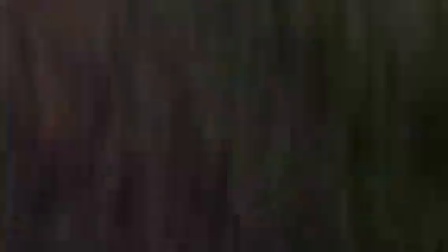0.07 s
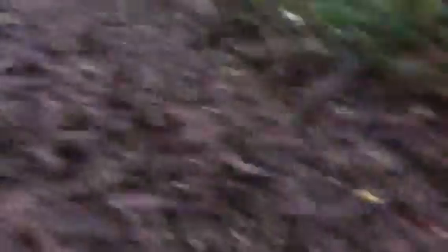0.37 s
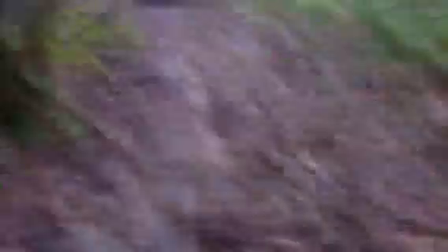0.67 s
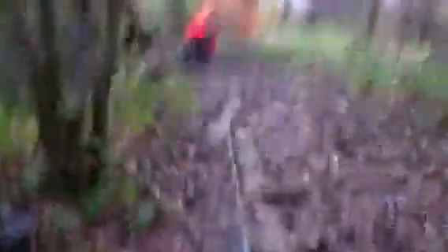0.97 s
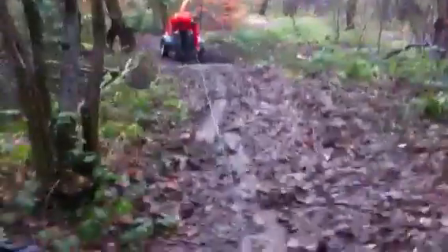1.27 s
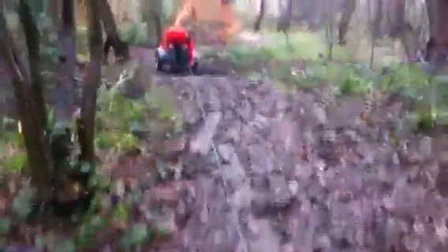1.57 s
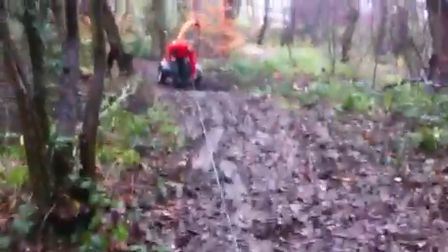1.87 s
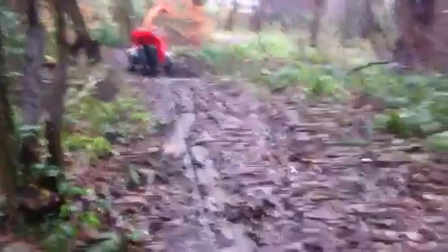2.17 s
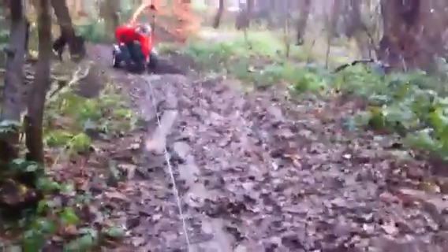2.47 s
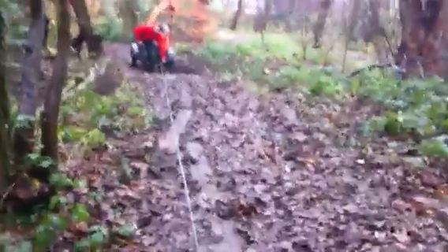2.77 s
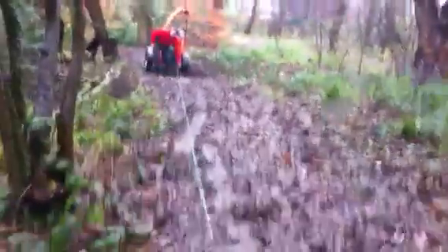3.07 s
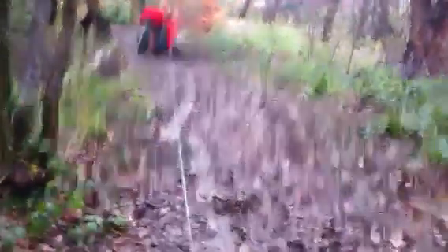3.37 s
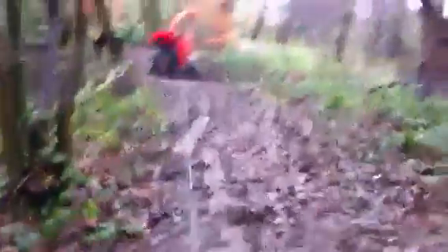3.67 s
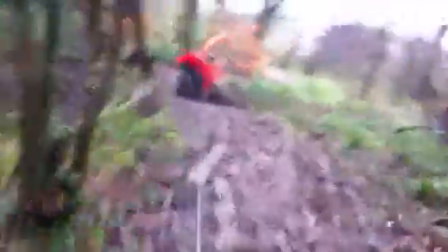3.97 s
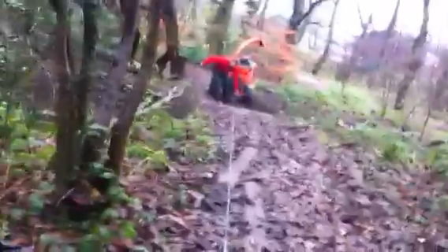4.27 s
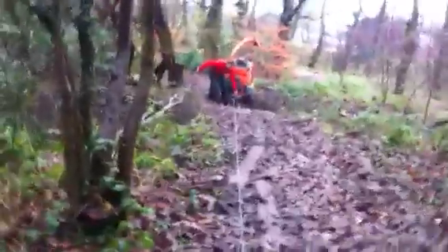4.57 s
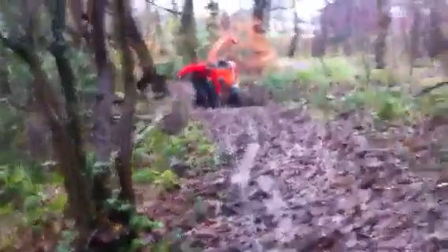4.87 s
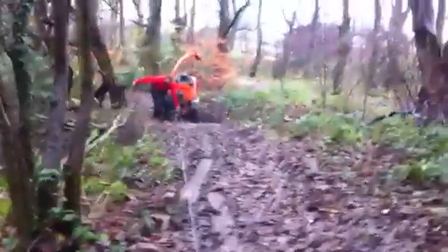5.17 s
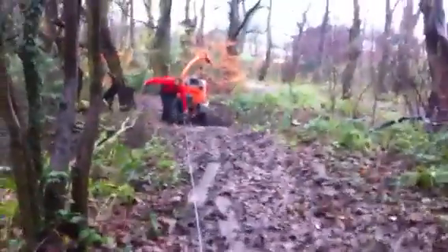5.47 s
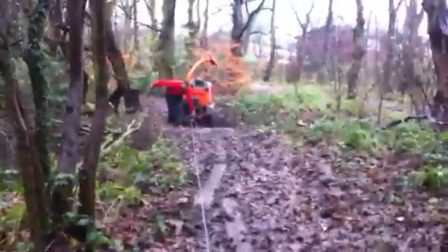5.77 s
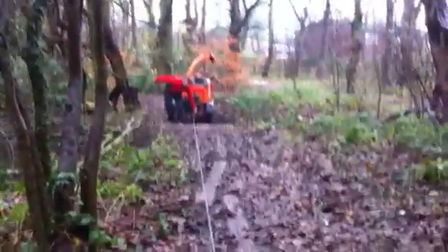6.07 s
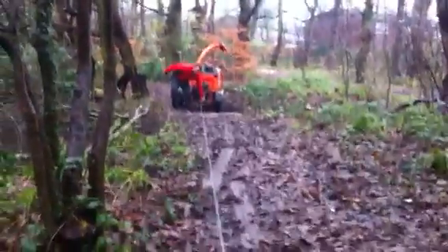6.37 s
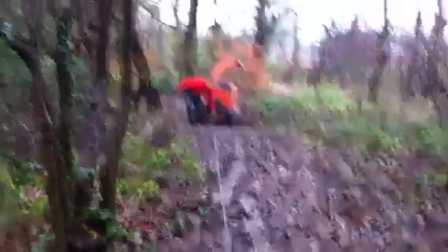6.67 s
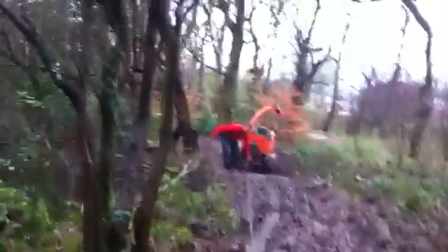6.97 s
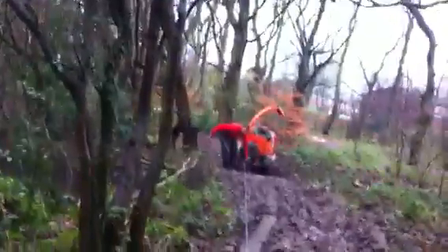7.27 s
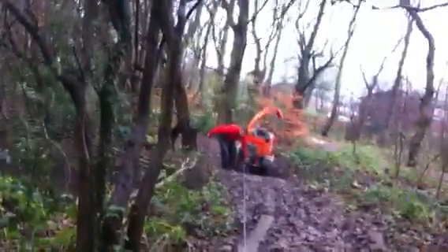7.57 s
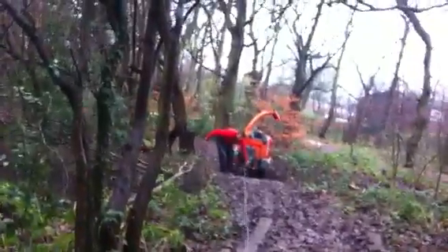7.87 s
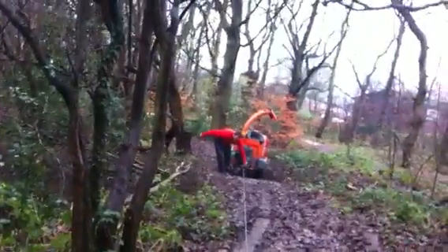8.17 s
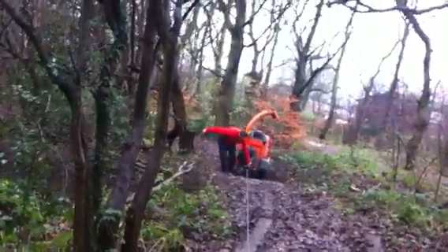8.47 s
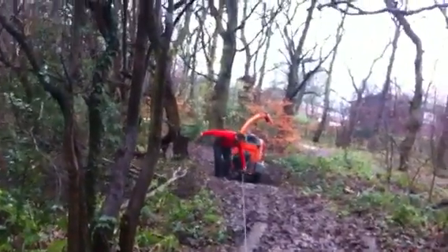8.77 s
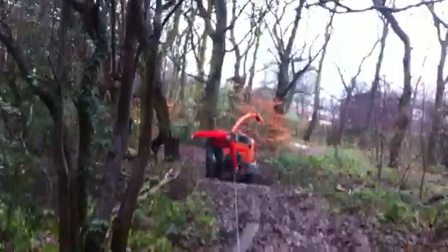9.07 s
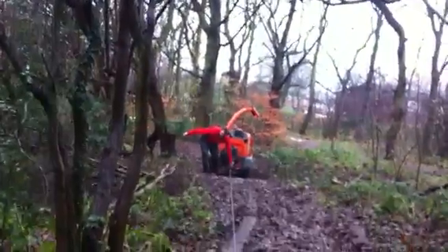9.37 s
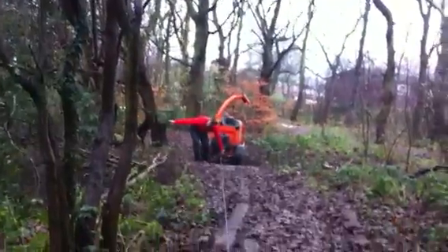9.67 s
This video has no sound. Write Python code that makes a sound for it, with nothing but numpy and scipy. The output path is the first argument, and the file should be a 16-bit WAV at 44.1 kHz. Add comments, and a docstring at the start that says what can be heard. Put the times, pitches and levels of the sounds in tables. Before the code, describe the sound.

A nearby electric winch coasts to a stop, pauses with small knocks, then clacks and runs again with a loud whine and metallic rattle.

```python
"""An electric winch, close by, drags a machine up a muddy woodland track on its cable.
It coasts to rest; small knocks and a rustle fill the pause, over a distant rumble.
Then its contactor clacks and it runs up again: a ten-tooth pinion whines, tooth impacts rattle
the housing, loose steel chatters brightly and the motor brushes hiss."""
import sys
import numpy as np
from scipy import signal
from scipy.fft import rfft, irfft
from scipy.io import wavfile
from scipy.ndimage import uniform_filter1d

SR = 44100
rng = np.random.default_rng(int(sys.argv[2]) if len(sys.argv) > 2 else 0)


def generate_wav(sig):
    """Save sig (samples, or channels by samples) to the path in sys.argv[1] as 16-bit PCM at SR."""
    pcm = np.round(np.clip(np.atleast_2d(sig).T, -1, 1) * 32767).astype(np.int16)
    wavfile.write(sys.argv[1], SR, pcm)


N = 428211
TIME = np.arange(N) / SR
HZ = np.fft.rfftfreq(16384, 1 / SR)
START_S, PINION_TEETH = 1.8, 10
RUN_TIME_S = np.maximum(TIME - START_S, 0)  # since the gears engaged

# A small housing radiates little bass. Each row: frequency in Hz, gain in dB.
LOW_CUT = [(40, -45), (100, -6.5), (200, -3), (330, 2), (16000, 6)]


def amp(db):
    """Decibels to gain."""
    return 10 ** (np.asarray(db) / 20)


def unit(x):
    """Scales to rms 1."""
    return x / np.sqrt(np.mean(x ** 2) + 1e-20)


def slope(points):
    """Gain over frequency through (Hz, dB) points."""
    hz, db = np.transpose(points)
    return amp(np.interp(np.log(HZ + 1), np.log(hz), db))


def peaks(modes):
    """Gain over frequency of a set of resonances."""
    return np.sqrt(sum(amp(db) ** 2 / (1 + (2 * (HZ - hz) / width) ** 2) for hz, width, db in modes))


def ring(x, gain):
    """Passes x through a minimum-phase body with this gain over frequency."""
    log_gain = np.log(np.maximum(np.r_[gain, gain[-2:0:-1]], 1e-5))
    response = np.fft.ifft(np.exp(np.conj(signal.hilbert(log_gain)))).real
    taper = np.hanning(2 * len(HZ))[len(HZ):]
    return signal.oaconvolve(x, response[:len(HZ)] * taper)[:len(x)]


def per_band(gain, band_hz):
    """Scales a gain so that unit white noise comes out with rms 1 inside the band."""
    return gain / np.sqrt(np.mean(gain ** 2 * (HZ > band_hz[0]) * (HZ < band_hz[1])))


def wander(rate_hz):
    """Random drift of rms 1, up to about this rate."""
    hz = np.fft.rfftfreq(N, 1 / SR)
    return unit(irfft(rfft(rng.standard_normal(N)) / (1 + (hz / rate_hz) ** 2) * (hz > 2), N))


def curve(points):
    """Straight lines over time through (s, value) points."""
    return np.interp(TIME, *np.transpose(points))


def level(points):
    """Gain through (s, dB) points: silent before the first, held after the last."""
    s, db = np.transpose(points)
    return uniform_filter1d(np.interp(TIME, s, amp(db), left=0), size=200)


def bursts(rows, rise_s):
    """Puffs of noise, one per (start s, dB, decay s) row."""
    envelope = np.zeros(N)
    for start_s, db, decay_s in rows:
        age_s = np.maximum(TIME - start_s, 0)
        envelope += amp(db) * (1 - np.exp(-age_s / rise_s)) * np.exp(-age_s / decay_s)
    return envelope * rng.standard_normal(N)


def coast():
    """Freewheeling gears knock ever more slowly and leave the housing ringing."""
    # Slack knocks. Each row: time in seconds, knocks per second.
    knock_rate = [(0, 164), (.15, 85), (.27, 36)]
    # Dying rattle. Each row: time in seconds, relative level in dB.
    rattle_levels = [(0.0, -23), (0.092, -27.5), (0.194, -47), (0.27, -55)]
    # Resonances struck by the slack gears. Each row: frequency in Hz, width in Hz, gain in dB.
    slack_modes = [(189, 34, 5), (616, 35, -1), (800, 39, 1), (950, 50, 3.5), (1240, 55, -1), (1440, 31, 8),
                   (1570, 50, -5), (1870, 54, 1), (2500, 80, -2), (2710, 90, -2.5), (3480, 83, -5.5),
                   (4560, 63, -10), (5000, 70, -18), (6300, 200, -9), (6500, 150, -8), (8050, 220, -15),
                   (9200, 80, -14), (10200, 70, -16)]
    # Broad rattle spectrum. Each row: frequency in Hz, gain in dB.
    colour = [(60, -45), (200, -38), (1000, -7), (3000, -17), (5500, -21), (10500, -27), (15000, -47)]
    # Ringing housing. Each row: frequency in Hz, relative level in dB, T60 in seconds.
    ring_modes = [(483, -11.5, 0.96), (625, -20, .5), (925, 1.5, 1), (1265, -16, .5), (1445, 0, 0.88),
                  (2320, -4, 0.53)]
    count = np.cumsum(curve(knock_rate)) / SR
    contact = 0.42 + np.exp(-(count % 1) / 0.16)
    knocks = unit(contact * amp(1.3 * wander(120)) * rng.standard_normal(N))
    body = per_band(np.hypot(peaks(slack_modes), slope(colour)) * slope(LOW_CUT), (400, 4000))
    rattle = ring(knocks * level(rattle_levels) * amp(-3), body)
    tones = sum(amp(db - 60 * TIME / t60_s) * np.sin(2 * np.pi * (hz * TIME + rng.random()))
                for hz, db, t60_s in ring_modes)
    tones *= amp(-32.5 + 2 * wander(25))
    return (rattle + tones) * np.interp(TIME, [.22, .29], [1, 0])


def woodland(rumble_db=-47.5, hiss_db=-57.5):
    """A low, distant rumble under the trees, and faint even hiss."""
    # Rumble and hiss spectra. Each row: frequency in Hz, gain in dB.
    rumble_colour = [(25, -34), (55, -30), (85, -23.5), (135, 3), (240, 0), (310, 1), (360, -7),
                     (500, -7.5), (1400, -12), (2100, -26), (4000, -39)]
    hiss_colour = [(300, 12), (2000, 4), (4000, 2), (8000, -0.5), (15000, -0.5)]
    rumble = amp(rumble_db + 1.7 * wander(11)) * unit(ring(rng.standard_normal(N), slope(rumble_colour)))
    return rumble + amp(hiss_db) * unit(ring(rng.standard_normal(N), slope(hiss_colour)))


def handling():
    """Small handling knocks and a soft rustle of sleeve and leaves."""
    # Knocks. Each row: start in seconds, level in dB, decay in seconds.
    knocks = [(.289, -33, 0.0051), (.303, -38, 0.023), (.358, -44, 0.0055), (.607, -52, .008),
              (1.115, -47, .005), (1.177, -48, .004), (1.56, -44, .004)]
    # Rustle. Each row: time in seconds, relative level in dB.
    rustle_levels = [(0.7, -75), (0.79, -50.5), (0.92, -56), (0.946, -64), (0.972, -65), (1.0, -72)]
    # Knock and rustle spectra. Each row: frequency in Hz, gain in dB.
    knock_colour = [(120, -37), (200, -5), (530, 3), (683, -14), (748, 6), (1170, 4), (2020, -2),
                    (2170, -6), (6190, -8), (15000, -13)]
    rustle_colour = [(1180, -24), (2000, 5), (3040, -5), (3840, 3), (4750, -5), (7050, -1), (15500, -4)]
    grains = unit(amp(1.9 * wander(400)) * rng.standard_normal(N))
    envelope = level(rustle_levels) * amp(-.5) * np.interp(TIME, [.95, 1.15], [1, 0])
    rustle = ring(grains * envelope, unit(slope(rustle_colour)))
    return rustle + ring(bursts(knocks, rise_s=0.00032), unit(slope(knock_colour)))


def housing():
    """Gain over frequency of the gear housing: resonances over a broad shell response."""
    # Resonances. Each row: frequency in Hz, width in Hz, gain in dB.
    modes = [(309.3, 7.9, -13.5), (458.6, 25.5, -9), (507, 58, -14), (629, 18, -15), (754, 22, -9.5),
             (813, 44, -10), (946, 14.5, -2), (1326, 37, -13), (1409, 34, -6.5), (1582, 13, -28),
             (1899, 25, -12), (1980, 58, -15), (2274, 44, -16), (2400, 64, -22), (2560, 34, -9.5),
             (2766, 20, -18), (2890, 19, -19), (3047, 20, -13), (3437, 38, -14)]
    # Shell response. Each row: frequency in Hz, gain in dB.
    shell = [(60, -33), (220, -43), (350, -23), (560, -19.5), (1050, -20), (1200, -27), (1700, -21),
             (3200, -26), (4400, -22), (5400, -41), (7000, -36), (16000, -36)]
    return np.hypot(peaks(modes), slope(shell)) * slope(LOW_CUT)


def clacks():
    """The contactor shuts, then the gears take up their slack and thump the housing."""
    # Each row: start in seconds, relative level in dB, decay in seconds, thump offset in dB.
    hits = [(1.745, -19.5, 0.016, -18), (1.759, -14.5, 0.0084, -1), (1.779, -27.5, 0.011, 9.5)]
    # Clack spectrum. Each row: frequency in Hz, gain in dB.
    colour = [(100, -28), (600, 1), (2000, -15), (3500, -8), (4800, -1.5), (6300, 1.5), (8000, -3),
              (11000, -10), (15500, -12)]
    crack = bursts([(s, db, decay_s) for s, db, decay_s, _ in hits], rise_s=0.0013)
    thump = bursts([(s, db + thump_db, decay_s) for s, db, decay_s, thump_db in hits], rise_s=0.0013)
    tail = bursts([(s, db - 24, .025) for s, db, _, _ in hits], rise_s=0.0033)
    return amp(3.5) * ring(crack + tail, unit(slope(colour))) + ring(thump, unit(housing()))


def tooth_hz(start_share=.505, run_up_s=.22):
    """Tooth rate: the motor runs up from about half speed, then varies with the cable's pull."""
    # Motor speed. Each row: time in seconds, tooth rate in Hz once run up.
    speeds = [(2.6, 834), (3.0, 821), (3.8, 823), (4.1, 840), (4.5, 872), (5.4, 880), (5.7, 898),
              (6.0, 947), (6.4, 982), (6.8, 985), (7.4, 1052), (7.8, 1038), (8.5, 985), (8.9, 969),
              (9.71, 1006)]
    return curve(speeds) * (1 - (1 - start_share) * np.exp(-RUN_TIME_S / run_up_s))


def torque(free_hz=1100):
    """Relative torque: grows as the tooth rate sags below its no-load value, up to a limit."""
    return np.minimum(1 - tooth_hz() / free_hz, .4)


def load_db(usual_db=-30.5):
    """Load on the gears above its usual value."""
    # Each row: time in seconds, load as a rattle level in dB.
    loads = [(2.0, -26), (2.6, -30.0), (2.85, -28), (3.85, -31), (4.8, -31.0), (5.0, -30), (5.7, -32),
             (5.8, -34.0), (6.25, -33.5), (6.35, -32.5), (7.1, -33), (7.7, -28.5), (7.85, -32.5),
             (8.2, -29.5), (9.3, -30.5), (9.7, -32.5)]
    return curve(loads) - usual_db


def running():
    """Zero until the gears engage, then one."""
    return uniform_filter1d((TIME > START_S) * 1., size=200)


def follow(db, per_load, torque_db, start_cut_db, build_s):
    """Gain of a part: builds up after the start and follows load (dB per dB) and torque."""
    cut_db = start_cut_db * np.exp(-RUN_TIME_S / build_s)
    return running() * amp(db + per_load * load_db() + torque_db * torque() - cut_db)


def surge():
    """Gain of the gear tones: a smooth swell at each strain."""
    # Each row: centre in seconds, 1/e half-width in seconds, boost in dB.
    strains = [(2.8, .07, 3), (3.13, 0.058, 5.5), (3.563, 0.17, 6), (8.9, 0.14, 5)]
    return amp(sum(db * np.exp(-((TIME - s) / half_s) ** 2) for s, half_s, db in strains))


def sing(hz, waver_hz, throb_db, rate_hz):
    """A mode kept ringing by uneven blows: its pitch wavers and its level throbs."""
    cycles = np.cumsum(hz + waver_hz * wander(rate_hz)) / SR
    return unit(np.sin(2 * np.pi * cycles) * amp(throb_db * wander(rate_hz)))


def whine(teeth, wobble=0.1, rasp=0.28, fade_db_per_s=14):
    """The pinion's raspy tone swells in each mount resonance; a rough fifth rises with it and fades."""
    # Gear mount resonances. Each row: frequency in Hz, width in Hz, gain in dB.
    mount_modes = [(492, 30, -1.5), (720, 120, -6), (822.5, 7.7, -3), (890, 53, -4.5), (974, 12.5, -5)]
    mount = np.interp(tooth_hz(), HZ, peaks(mount_modes))
    uneven = 1 + wobble * np.sin(2 * np.pi * teeth / PINION_TEETH) + rasp * wander(87)
    pinion = np.sqrt(2) * np.sin(2 * np.pi * teeth) * mount * uneven * amp(2.25 * wander(18))
    pinion *= follow(-28, per_load=1.83, torque_db=-0.5, start_cut_db=9, build_s=0.9)
    fifth = sing(1.5 * tooth_hz(), waver_hz=38, throb_db=3, rate_hz=60)
    fifth *= follow(-30.5, per_load=2.5, torque_db=0, start_cut_db=24, build_s=0.7)
    return pinion + fifth * amp(-fade_db_per_s * RUN_TIME_S)


def drone(low_hz=489.5, build_s=0.66):
    """The housing sings: a strong low mode, and two that swell as shaft multiples meet them."""
    # Low mode. Each row: time in seconds, relative level in dB.
    low_levels = [(1.85, -29.5), (2.4, -47), (2.5, -33.5), (3.8, -42), (3.95, -35.5), (5.1, -33.5),
                  (5.2, -39.5), (5.95, -30.5), (6.1, -43.5), (6.6, -27), (6.85, -29), (7.1, -41.5),
                  (7.55, -39.5), (7.6, -34), (8.3, -28), (8.6, -34.0), (9.0, -27), (9.7, -33.5)]
    # Higher modes. Each row: frequency in Hz, capture width in Hz, floor in dB,
    # drive on a multiple in dB, dB per dB of load, waver in Hz, throb in dB.
    high_modes = [(638, 13.5, -66, -35, 0.1, 3.1, 2), (1420.5, 49, -35.5, -32.5, 1.4, 13.1, 3)]
    low = amp(curve(low_levels) + 0.5) * sing(low_hz, waver_hz=7.4, throb_db=3, rate_hz=24.4)
    shaft_hz = tooth_hz() / PINION_TEETH
    high = np.zeros(N)
    for hz, width_hz, floor_db, on_db, per_load, waver_hz, throb_db in high_modes:
        detune_hz = hz - shaft_hz * np.round(hz / shaft_hz)
        drive = np.hypot(amp(floor_db), amp(on_db) / np.hypot(1, 2 * detune_hz / width_hz))
        high += drive * amp(per_load * load_db()) * sing(hz, waver_hz, throb_db, rate_hz=36)
    return low * running() + high * (1 - np.exp(-RUN_TIME_S / build_s))


def impacts(teeth, spread_db, clump_db, clump_hz, scrape):
    """Each tooth lands with its own force and scrapes on; blows bunch up as the slack wanders."""
    force = amp(spread_db * np.clip(rng.standard_normal(N), -2, 2))[teeth.astype(int)]
    contact = scrape + np.exp(-(teeth % 1) / 1.4)
    return unit(force * contact * amp(clump_db * wander(clump_hz)) * rng.standard_normal(N))


def gearbox(teeth, lurch):
    """Tooth impacts and gear tones shake the housing; the tones grow with torque."""
    # Gear tones. Each row: multiple of the shaft rate, relative level in dB.
    orders = [(3, -8.5), (4, -15), (5, -0.5), (6, -4), (7, -9), (8, -26), (9, -9.5), (11, -2), (12, -7),
              (13, -9), (15, -6.5), (16, -6), (19, -7), (20, -2), (21, -10), (30, -3)]
    turns = teeth / PINION_TEETH
    hum = sum(amp(db + 4.9 * wander(4.7)) * np.sin(2 * np.pi * order * turns) for order, db in orders)
    hum *= surge() * amp(-25.5 + 12 * torque())
    blows = impacts(teeth, spread_db=0.7, clump_db=0, clump_hz=60, scrape=1)
    gain = follow(-30, per_load=1, torque_db=2, start_cut_db=10.5, build_s=0.37)
    return ring((blows + hum) * lurch * gain, per_band(housing(), (1300, 4200)))


def chatter(blows, lurch):
    """Loose steel rings brightly under bunches of blows."""
    # Steel resonances. Each row: frequency in Hz, width in Hz, gain in dB.
    modes = [(4747.0, 66.0, -14.0), (4956.0, 66.0, -15.0), (5988.0, 90.0, 0.5), (6150.0, 98.0, -1.0),
             (6290.0, 92.0, -0.5), (6609.0, 137.0, -8.0), (6887.0, 36.0, 2.0), (7061.0, 45.0, -19.0),
             (7365.0, 169.0, -9.0)]
    # Their overall shape. Each row: frequency in Hz, gain in dB.
    colour = [(60, -70), (1000, -24.5), (3500, -5.5), (4700, 6), (7600, 4), (9500, 10), (16000, 1.5)]
    steel = per_band(peaks(modes) * slope(colour), (5700, 7300))
    gain = follow(-18, per_load=-0.27, torque_db=-1, start_cut_db=22, build_s=0.22)
    return ring(blows * lurch * gain * amp(wander(22)), steel)


def brushes(teeth, blows, lurch):
    """The brushes rub and spark; their holders ring harder under torque."""
    # Holder resonances. Each row: frequency in Hz, width in Hz, gain in dB.
    holder_modes = [(5547, 40, -6), (7830, 80, 2), (8858, 100, -6), (10075, 254, -13), (10725, 141, -14)]
    # Holder and hiss spectra. Each row: frequency in Hz, gain in dB.
    holder_colour = [(60, -20), (4000, -4), (7000, -0.5), (10500, 0), (11800, -5), (16000, -15)]
    hiss_colour = [(60, -80), (2000, -29.5), (5200, -15.5), (7000, -10.5), (9300, -17), (11000, -22.5),
                   (11700, -28.5), (12600, -24.5), (13500, -30), (15500, -30.5)]
    # The holders ring louder at first. Each row: time in seconds, gain in dB.
    settling = [(1.85, 1.5), (2.3, 3), (3.35, 3), (3.6, -1.5)]
    holders = per_band(peaks(holder_modes) * slope(holder_colour), (7600, 11000))
    hiss = per_band(slope(hiss_colour) * slope(LOW_CUT), (7600, 11000))
    sparks = impacts(teeth, spread_db=-0.8, clump_db=1.6, clump_hz=80, scrape=0.35)
    sparks *= follow(-28.6, per_load=.55, torque_db=7, start_cut_db=24, build_s=.085)
    rubbing = .8 * impacts(teeth, spread_db=2.2, clump_db=1.2, clump_hz=80, scrape=.5) + .6 * blows
    rubbing *= follow(-30, per_load=1.5, torque_db=1.5, start_cut_db=33, build_s=0.2)
    return ring(sparks * lurch * amp(curve(settling)), holders) + ring(rubbing * lurch, hiss)


def winch(tone_cut_hz=223):
    """One fluttering shaft drives the parts, and its slack shakes them together."""
    teeth = np.cumsum(tooth_hz() * (1 + .002 * wander(14))) / SR  # teeth met so far
    lurch = amp(0.54 * wander(29))
    highpass = signal.butter(3, tone_cut_hz, "highpass", fs=SR, output="sos")
    tones = signal.sosfilt(highpass, whine(teeth) * surge() + drone())
    rattle = gearbox(teeth, lurch)
    blows = impacts(teeth, spread_db=1, clump_db=1, clump_hz=108, scrape=0.65)
    return tones + rattle + brushes(teeth, blows, lurch) + chatter(blows, lurch)


def scene():
    """All sources, the same in both channels."""
    return np.tile(winch() + coast() + clacks() + handling() + woodland(), (2, 1))


def record(dry, ceiling_db=-2, edge_hz=15800):
    """The microphone rounds off the highest peaks; a low-pass limits the band."""
    rounded = dry / (1 + (dry / amp(ceiling_db)) ** 6) ** (1 / 6)
    lowpass = signal.firwin(511, edge_hz, window=("kaiser", 9), fs=SR)
    return signal.oaconvolve(rounded, lowpass[None], "same")


dry = scene()
out = record(dry)
generate_wav(out)
```